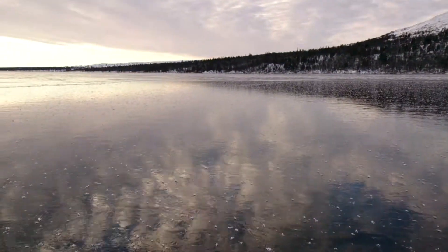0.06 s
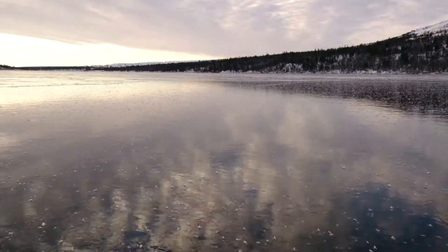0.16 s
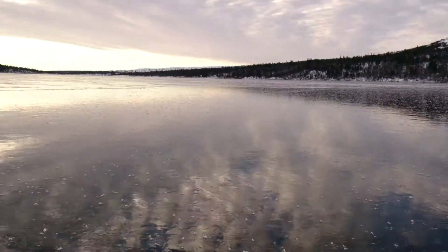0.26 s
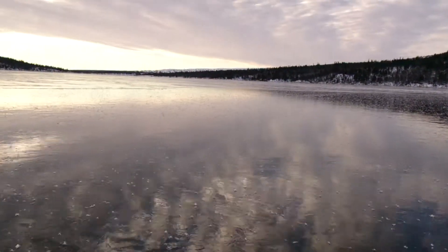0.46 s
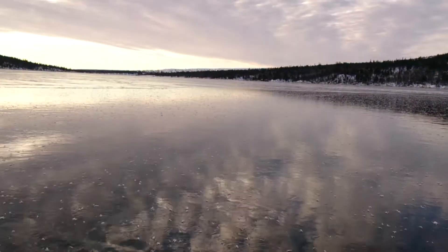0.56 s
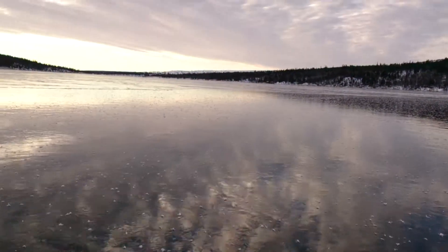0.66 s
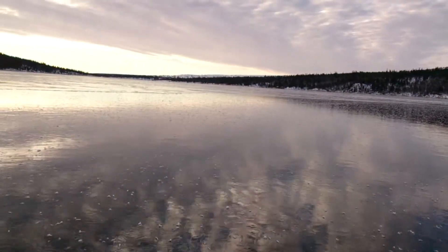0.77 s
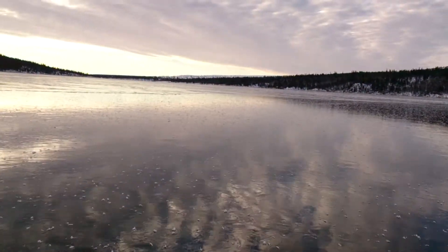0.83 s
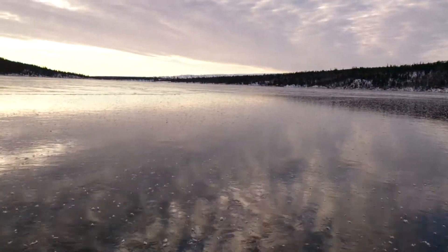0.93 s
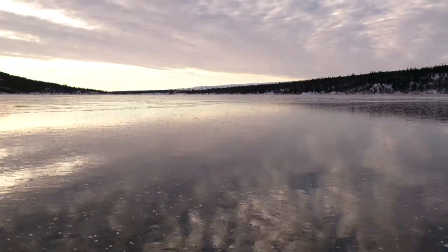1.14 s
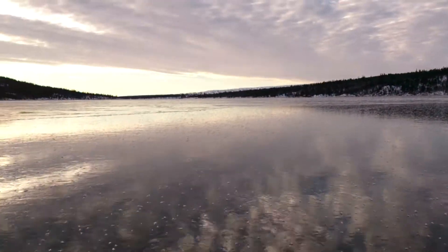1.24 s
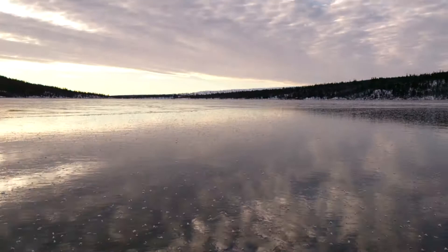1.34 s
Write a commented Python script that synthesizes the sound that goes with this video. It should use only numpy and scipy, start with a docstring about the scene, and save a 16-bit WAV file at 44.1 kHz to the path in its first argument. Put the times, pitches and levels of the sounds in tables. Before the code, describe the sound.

Skate blades hiss and knock on open lake ice, cracking sharply once near the start. Smaller clicks, gritty scrapes and boot thumps follow, close up and without echo, as light wind nudges the skater's microphone.

```python
"""First a tick of a blade and the hiss of gliding steel, with wind nudging the microphone: a frozen
lake, open air, no echo, heard close up from a stereo microphone that the skater carries. Edges scrape
the ice into tiny grains. Blades and bindings knock and ring the skate, once with a loud crack and
rattle; the hollow boots thump and a loose chip of ice chirps, mostly on the right."""
import sys
import numpy as np
from scipy import signal
from scipy.fft import rfft, irfft
from scipy.io import wavfile

SR = 44100
rng = np.random.default_rng(int(sys.argv[2]) if len(sys.argv) > 2 else 0)


def to_wav(s):
    """Save 16-bit WAV."""
    ch = np.atleast_2d(s).T  # columns
    pcm = np.round(np.clip(ch, -1, 1) * 32767)  # PCM
    wavfile.write(sys.argv[1], SR, pcm.astype(np.int16))


N = 61739
T = np.arange(N) / SR
FFT_SIZE = 2 ** 17
HZ = np.maximum(np.arange(FFT_SIZE // 2 + 1) * SR / FFT_SIZE, 1)


def amp(db):
    """Decibels to gain."""
    return 10 ** (np.asarray(db) / 20)


def unit(x):
    """Scale to rms 1."""
    return x / np.sqrt(np.mean(x ** 2))


def curve(points, hz=HZ):
    """Join (f/Hz, level/dB) points along a log-frequency axis."""
    f, db = np.array(points, float).T
    return np.interp(np.log(hz), np.log(f), db)


def resonances(table, hz=HZ):
    """Summed response of damped resonances in dB."""
    powers = (amp(db) ** 2 / (1 + ((hz / f - f / hz) * f / width) ** 2) for f, width, db in table)
    return 10 * np.log10(sum(powers))


def colour(x, db):
    """Causal filter with the given gain at evenly spaced frequencies."""
    cepstrum = irfft(np.log(amp(db)))
    n = len(cepstrum)
    cepstrum[1:n // 2] *= 2
    cepstrum[n // 2 + 1:] = 0
    return irfft(rfft(x, n) * np.exp(rfft(cepstrum)))[..., :x.shape[-1]]


def grit(n, grain_db=3, grain_hz=874, split_hz=1470, spread_rad=1):
    """Ice crumbling in tiny uneven grains; the treble differs between the microphone's two ports."""
    shared, own = rng.standard_normal((2, n))
    sizes = np.interp(np.arange(n) * grain_hz / SR, np.arange(n), rng.standard_normal(n))
    highpass = signal.butter(2, split_hz, "high", fs=SR, output="sos")
    shared_treble, own_treble = signal.sosfilt(highpass, [shared, own])
    left = shared + (np.cos(spread_rad) - 1) * shared_treble + np.sin(spread_rad) * own_treble
    return unit(np.array([left, shared]) * amp(grain_db * sizes))


# resonances of skate and boot: f/Hz, width/Hz, level/dB
SKATE_MODES = [(193, 170, 1), (443, 190, -1.5), (826, 170, -6.5), (1427, 71, 9), (1847, 157, 16),
               (2380, 89, 6), (3000, 390, 2), (5450, 690, -5), (8170, 600, -10)]
# antiresonances between them: f/Hz, half width/Hz, gain/dB
SKATE_GAPS = [(1294, 150, -5.5), (2672, 77, -27), (4420, 680, -13), (7160, 284, -11)]
# the skate's treble roll-off: f/Hz, gain/dB
SKATE_ROLLOFF = [(9200, 1), (12000, -14)]
def skate(hz=HZ):
    """Response of skate and boot in dB, rung by scrapes, knocks and rattle alike."""
    gaps = sum(db * np.exp(-((hz - f) / width) ** 2) for f, width, db in SKATE_GAPS)
    return resonances(SKATE_MODES, hz) + gaps + curve(SKATE_ROLLOFF, hz)


# steady glide on the lake, below the microphone: t/s, rumble level/dB, hiss level/dB
GLIDE = [(0, -55, -62.5), (.12, -57, -61), (.19, -62.5, -62), (.56, -64, -80), (.75, -55, -69),
         (.83, -59.5, -74.5), (1.0, -51, -65), (1.4, -58.5, -69)]
# spectrum of its rumble: f/Hz, level/dB
RUMBLE_COLOUR = [(540, 3), (1650, 0), (1860, 11), (2150, -1.5), (3300, 1), (5800, -11), (7000, -21.5)]
# light knocks and ticks of the blade on the ice: t/s, body level/dB, hiss level/dB
BLADE_TICKS = [(.004, -36, -35.5), (0.027, -39.5, -56), (0.305, -45, -59), (.378, -42.5, -60),
               (0.5627, -44, -53), (.769, -54, -56.5), (.919, -74, -54.5), (1.251, -44.5, -58),
               (1.324, -44.5, -62)]
# bites of an edge: peak t/s, rise/s, fall/s, body level/dB, hiss level/dB
EDGE_SCRAPES = [(0.148, 0.0076, 0.0068, -36.5, -43.5), (0.323, 0.013, 0.011, -56.5, -51.5),
                (0.499, 0.0082, 0.018, -43.5, -45.5), (0.666, 0.12, 0.037, -60, -58),
                (0.714, 0.033, 0.021, -47.5, -48), (1.03, 0.008, 0.0062, -39.5, -43.5),
                (1.1, 0.0019, 0.026, -44, -49), (1.121, 0.014, 0.018, -54.5, -49)]
# body of a scrape: f/Hz, width/Hz, level/dB
BODY_MODES = [(1410, 1030, -1), (3080, 1800, -4), (5260, 540, -3.5)]
# hiss of steel on ice: f/Hz, level/dB
HISS_COLOUR = [(2000, -48.5), (5500, 2), (9500, 4), (16000, -17.5)]
# thin ring of the blade: f/Hz, width/Hz, level/dB
STEEL_MODES = [(4630, 20, 14), (5663, 146, 8), (9200, 60, -6)]
def blades(tick_rise_s=.001, tick_fall_s=.0035, ring_share=.29):
    """Steel glides over the ice; an edge bite swells and dies as a scrape, a light knock as a tick."""
    body_power, hiss_power = 0, 0
    ticks = [(at, tick_rise_s, tick_fall_s, *levels) for at, *levels in BLADE_TICKS]
    for at, rise, fall, body_db, hiss_db in EDGE_SCRAPES + ticks:
        swell = np.exp(-np.maximum((at - T) / rise, (T - at) / fall))
        body_power += (swell * amp(body_db)) ** 2
        hiss_power += (swell * amp(hiss_db)) ** 2
    times, rumble_db, glide_hiss_db = np.array(GLIDE).T
    hiss_power += amp(np.interp(T, times, glide_hiss_db)) ** 2
    ring_db = ring_share * skate()
    steel_db = 10 * np.log10(amp(curve(HISS_COLOUR) + ring_db) ** 2 + amp(resonances(STEEL_MODES)) ** 2)
    body = np.sqrt(body_power) * unit(colour(grit(N), resonances(BODY_MODES) + ring_db))
    hiss = np.sqrt(hiss_power) * unit(colour(grit(N, grain_db=1.5, grain_hz=597), steel_db))
    rumble = amp(np.interp(T, times, rumble_db)) * unit(colour(grit(N), curve(RUMBLE_COLOUR)))
    return body + hiss + rumble


# wind right on the microphone, dying down: t/s, level/dB
WIND_LEVEL = [(0, -38), (.55, -50.5), (1.4, -59)]
# spectrum of its flutter: f/Hz, level/dB
WIND_COLOUR = [(22, 2), (80, -10.5), (250, -32), (1000, -54)]
# low wind buffets, and one low boot thump at 1.26 s: t/s, level/dB, f/Hz
LOW_PULSES = [(0.317, -33, 48), (.412, -34, 39.8), (0.791, -37, 40), (.833, -35, 55.4),
              (1.178, -36.5, 28.4), (1.257, -39, 115)]
def wind_and_low_thump(pulse_cycles=.74, left_db=-11):
    """Wind flutters, unrelated at the two ports; its buffets and one boot thump last a cycle or two."""
    flutter = unit(colour(rng.standard_normal((2, N)), curve(WIND_COLOUR)))
    out = flutter * amp(np.interp(T, *np.array(WIND_LEVEL).T))
    for at, db, hz in LOW_PULSES:
        cycles = (T - at) * hz
        swell = amp(db) * np.exp(-(cycles / pulse_cycles) ** 2)
        out += swell * np.sin(2 * np.pi * (cycles + rng.random((2, 1))))
    return out * amp([[left_db], [0]])


# band centres of a knock: f/Hz
KNOCK_BANDS = [400, 1000, 1850, 3600, 7700]
# knocks at the skater's feet, the second one the loud crack:
# t/s, crunch decay/ms, pitch ratio of the ring, then level/dB in each band
KNOCKS = [(.1500, 3.1, 1, -46.5, -42, -38, -42.5, -43),
          (0.2102, 1.84, 1.034, -25, -21.5, -14.5, -22.5, -28),
          (0.2337, 2.7, 1.006, -38.5, -42, -33, -36.5, -44.5),
          (.4306, 2.9, 1.016, -40, -37.5, -33, -50.5, -35.5),
          (0.4844, 2.78, 0.99, -45.5, -34, -28, -34.5, -42.5),
          (0.675, 1.9, 0.79, -54, -49, -48.5, -41.5, -95), (0.857, 3.2, 0.99, -58, -47, -46, -56.5, -67),
          (0.946, 3.9, 1.056, -50, -47.5, -46.5, -52, -64.5),
          (1.033, 0.78, 0.99, -51, -41.5, -34, -49, -57), (1.1301, 3.1, 1.3, -43.5, -49.5, -41.5, -72, -74),
          (1.2048, 2.95, 0.94, -62, -45, -43, -49, -52.5),
          (1.3634, 1.3, 1.07, -50, -53.5, -46, -62.5, -71.5)]
def knocks(blow_s=.00008, crunch_rise_s=.001, level_span_s=.01, size=4096):
    """Blade and binding strike: a blow and a crunch of ice ring the skate, each time in its own colour."""
    out = np.zeros((2, N + size))
    t = np.arange(size) / SR
    hz = np.maximum(np.arange(size // 2 + 1) * SR / size, 1)
    nearest_band = np.argmin(abs(np.log(hz[:, None] / KNOCK_BANDS)), axis=1)
    for at, decay_ms, pitch, *levels in KNOCKS:
        crunch = grit(size) * np.exp(-t * 1000 / decay_ms) * (1 - np.exp(-t / crunch_rise_s))
        crunch_db = -3 + 4 * decay_ms  # against the blow: a longer crunch is stronger
        crunch *= amp(crunch_db) / np.sqrt(np.sum(crunch[1] ** 2))
        blow = np.exp(-t / blow_s)
        blow /= np.sqrt(np.sum(blow ** 2))
        hit = colour(crunch + blow, skate(hz / pitch))
        for _ in range(2):  # bring each band towards its level, energy taken over level_span_s
            power = np.bincount(nearest_band, abs(rfft(hit[1])) ** 2) * 2 / (size * level_span_s * SR)
            gains_db = levels - 10 * np.log10(power)
            hit = colour(hit, curve(list(zip(KNOCK_BANDS, gains_db)), hz))
        start = int(at * SR)
        out[:, start:start + size] += hit
    return out[:, :N]


# boots landing below the microphone: t/s, level/dB
BOOT_THUMPS = [(.151, -35), (0.375, -49.5), (0.432, -30), (1.0315, -32), (1.2034, -34.5), (1.325, -42.5)]
def thumps(boot_hz=185, decay_s=.0057):
    """The hollow boot booms briefly when weight lands on it."""
    out = 0
    for at, db in BOOT_THUMPS:
        t = np.maximum(T - at, 0)
        out += amp(db) * np.exp(-t / decay_s) * np.sin(2 * np.pi * boot_hz * t)
    return out


# tilt of the skate's ring as it rattles underfoot: f/Hz, gain/dB
RATTLE_TILT = [(350, -3), (1900, -14)]
def rattle(start_s=.212, end_s=.229, decay_s=.059, level_db=-31.5):
    """The skate chatters after the crack until the weight settles on it."""
    fade = np.exp(-np.maximum(T - start_s, 0) / decay_s) * (T > start_s) * (T < end_s)
    ring_db = skate() + curve(RATTLE_TILT)
    ring_rms = np.sqrt(np.mean(amp(ring_db) ** 2))
    return amp(level_db) * colour(grit(N) * fade, ring_db) / ring_rms


# modes of an ice chip, right of the microphone: f/Hz, decay/s, relative level/dB, sweep/(Hz per ms)
CHIP_MODES = [(3260, 0.0012, 5, 160), (3960, 0.0032, -6, -1), (5000, 0.0021, -0.5, -170)]
def chip(at_s=.6085, attack_s=.00058, gain_db=-38.5, left_db=-14):
    """A loose chip of ice chirps once, its modes sliding in pitch as they die."""
    t = np.maximum(T - at_s, 0)
    ring = sum(amp(db) * np.exp(-t / decay) * np.sin(2 * np.pi * t * (hz + sweep * t * 1000 / 2))
               for hz, decay, db, sweep in CHIP_MODES)
    attack = 1 - np.exp(-(t / attack_s) ** 2)
    return 2 * amp([[gain_db + left_db], [gain_db]]) * ring * attack


# shading of the microphone's left port: f/Hz, gain/dB against the right
LEFT_SHADE = [(200, -7), (900, -3.5), (1450, -11), (3200, -10.5), (4200, -5.5), (5800, -11.5), (9300, -0.5),
              (12000, -7.5)]
def scene(left_lead_s=.00003):
    """The skates, close by and louder on the right, under a light wind on the open lake."""
    left, right = knocks() + thumps() + rattle() + blades() + chip()
    left = irfft(rfft(left, FFT_SIZE) * np.exp(2j * np.pi * HZ * left_lead_s))[:N]
    return np.array([colour(left, curve(LEFT_SHADE)), right]) + wind_and_low_thump()


def record(dry, ceiling=.9, top_hz=15800):
    """The carried recorder limits any peak just under full scale and cuts the top."""
    limited = np.clip(dry, -ceiling, ceiling)
    return signal.sosfilt(signal.ellip(8, .2, 70, top_hz, fs=SR, output="sos"), limited)


dry = scene()
out = record(dry)
to_wav(out)
```